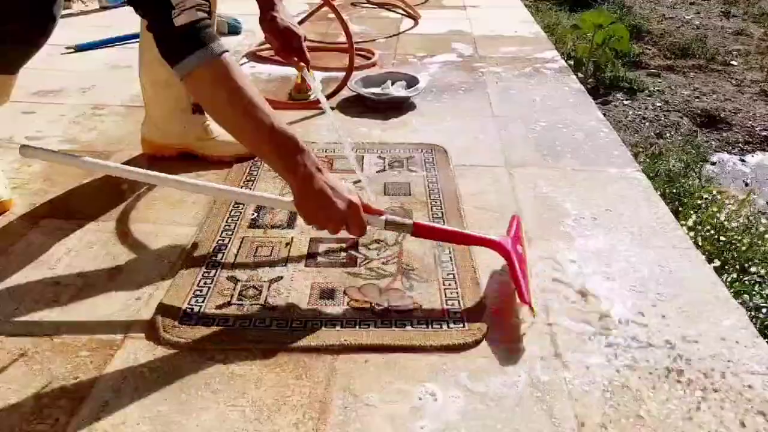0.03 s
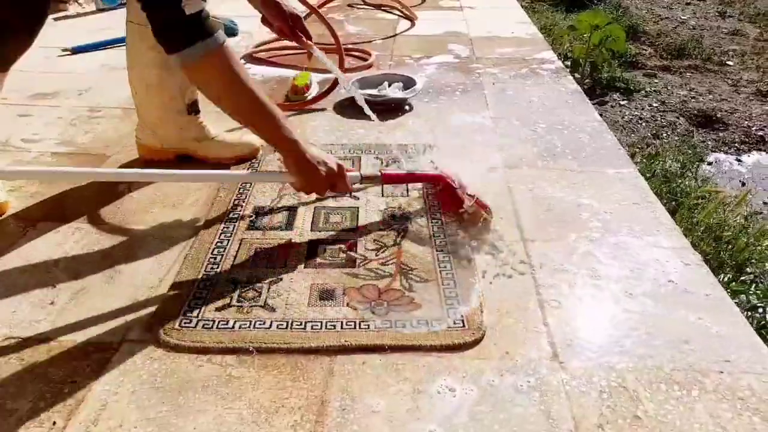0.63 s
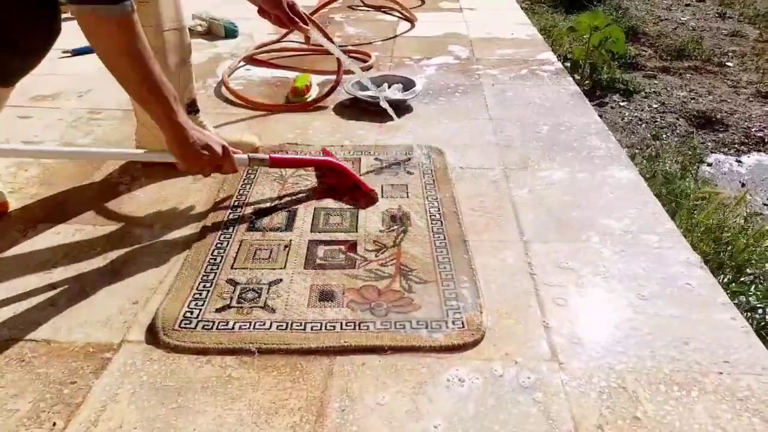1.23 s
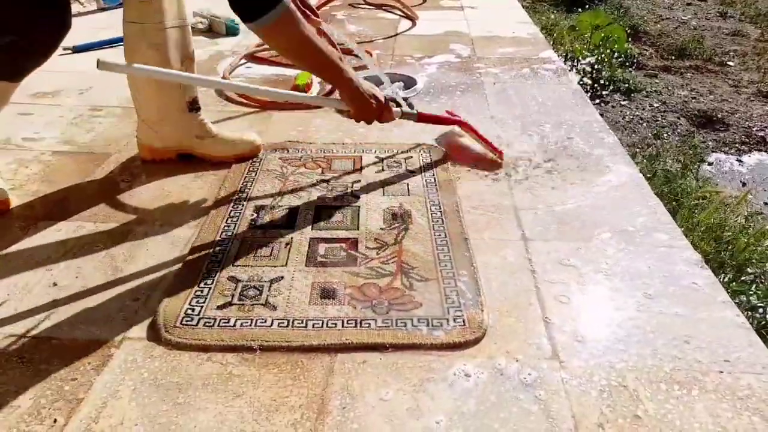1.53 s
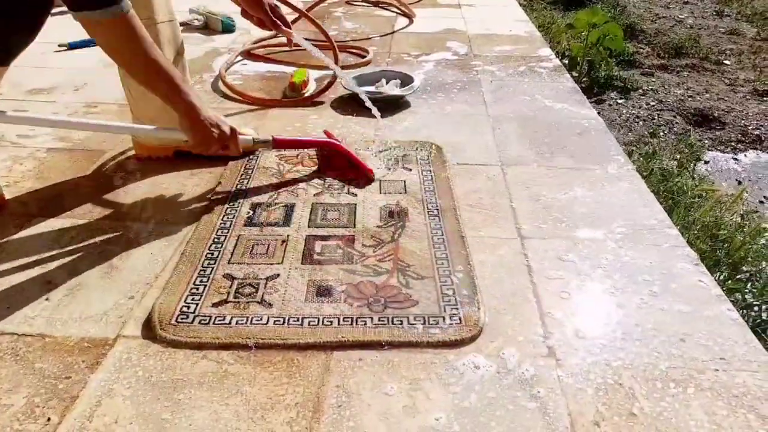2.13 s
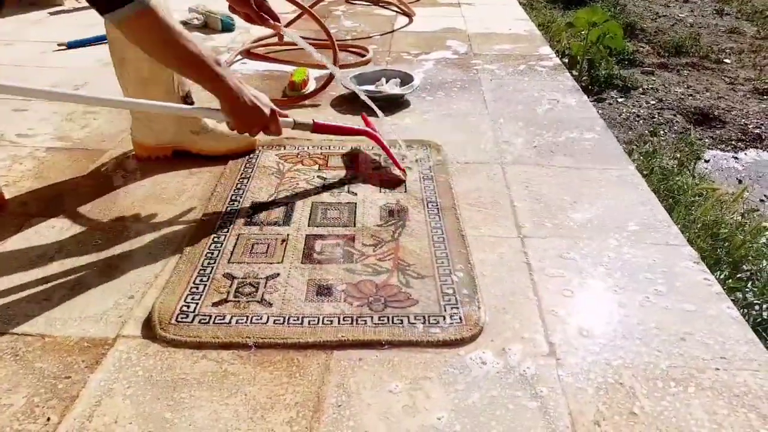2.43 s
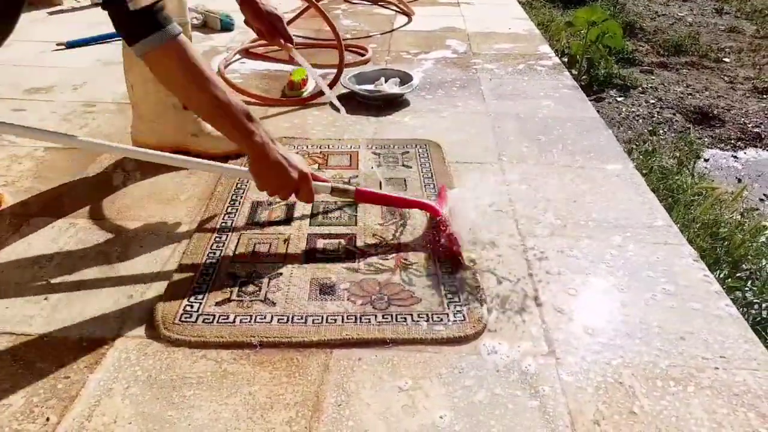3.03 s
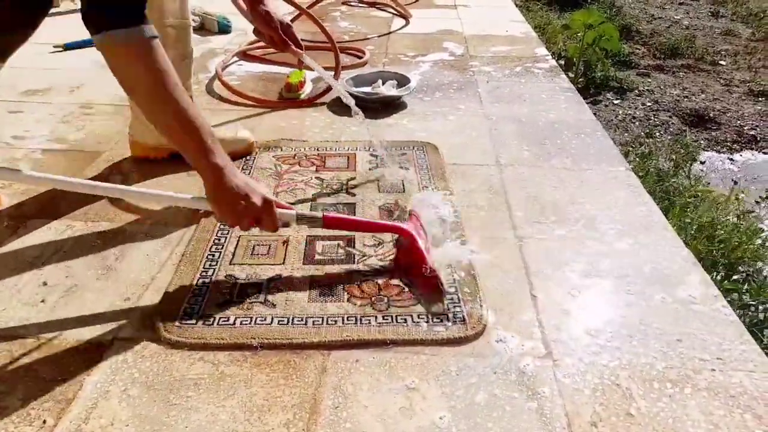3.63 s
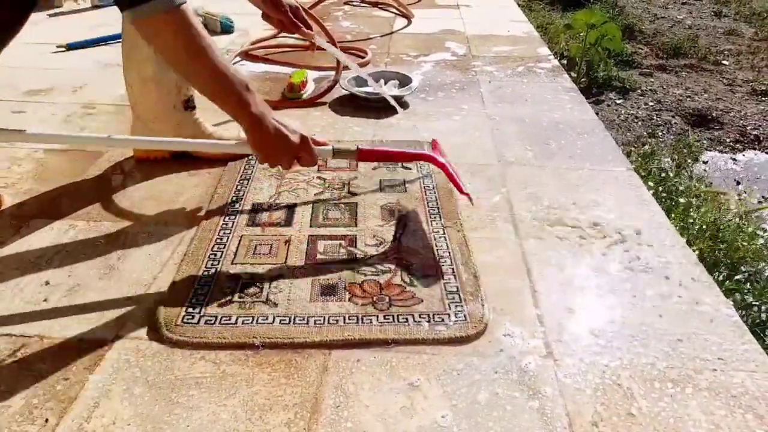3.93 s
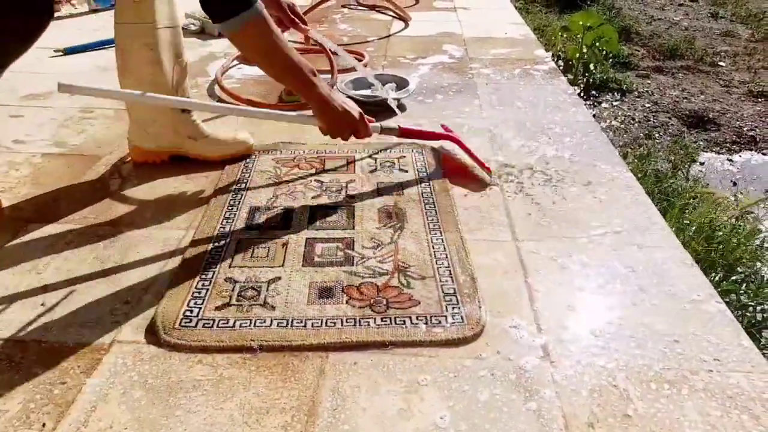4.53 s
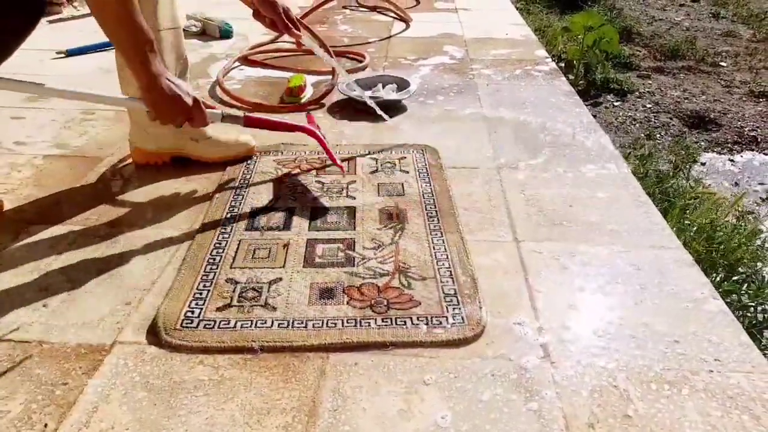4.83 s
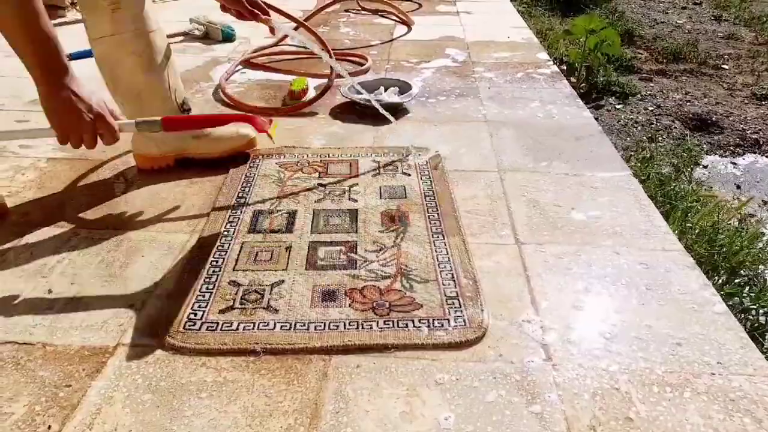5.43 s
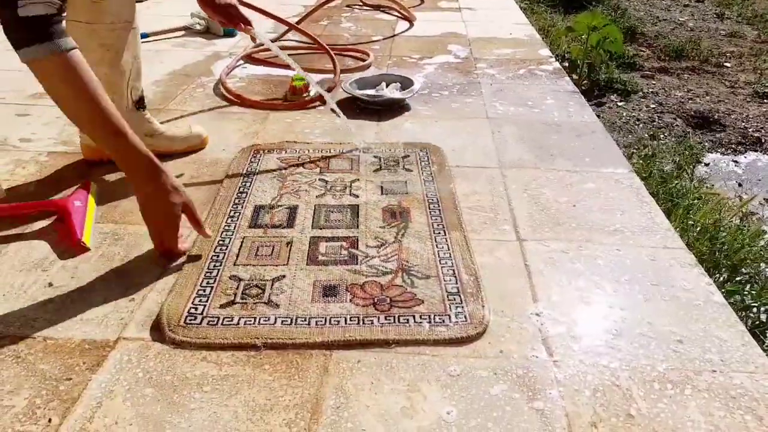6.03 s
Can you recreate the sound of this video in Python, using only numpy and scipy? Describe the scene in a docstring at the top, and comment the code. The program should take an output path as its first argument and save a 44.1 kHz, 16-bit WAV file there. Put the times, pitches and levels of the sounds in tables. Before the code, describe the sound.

Close by on an outdoor stone patio, a rubber blade chatters and splashes over a wet rug in seven quick, evenly spaced pushes. Some finish with a sharp knock from the hollow plastic head, echoing briefly off a wall. Between them, runoff drips over the faint trickle of a hose. Finally the squeegee handle falls and clatters on the paving in several bounces that die away.

```python
"""Seven wet, chattering pushes of a plastic squeegee over a soaked rug, then its handle bouncing on stone.
The rubber blade sticks and slips on the pile: each slip thumps the rug and squirts water.
Some strokes end in a clack that rings the hollow head. A hose trickles throughout, and pushed-off
water runs and drips between strokes. The house wall and the stone patio throw the knocks back."""
import sys
import numpy as np
from scipy import signal
from scipy.fft import rfft, irfft, next_fast_len
from scipy.io import wavfile

SR = 44100
rng = np.random.default_rng(int(sys.argv[2]) if len(sys.argv) > 2 else 0)


def int16_out(signal):
    """Quantize to a 16-bit WAV file."""
    q = np.round(np.clip(np.atleast_2d(signal).T, -1, 1) * 32767)
    wavfile.write(sys.argv[1], SR, q.astype(np.int16))


N = 276948
T = np.arange(N) / SR
RIGHT_DELAY_S = 0.0002234

# Blade pushes: land_s, grip_s, hardest_s, lift_s, water_delay_s, bump_db, thump_db, slosh_db, spray_db,
# land_slips_per_s, lift_slips_per_s, rubber_hz
STROKES = [(.434, .575, 0.62, 0.71, 0.0079, -36, -27.5, -36.5, -32, 90.4, 71.4, 287),
           (1.219, 1.288, 1.395, 1.472, .001, -31.5, -23.5, -35, -32.5, 85, 79, 280),
           (1.973, 2.14, 2.24, 2.284, 0.032, -39.5, -29, -38.5, -35, 65.8, 101, 290),
           (2.738, 2.915, 2.96, 3.075, 0.032, -42.5, -28, -35, -32.5, 80, 62.3, 341),
           (3.528, 3.608, 3.696, 3.745, 0.00072, -40, -29.5, -31, -30, 75, 75, 288.3),
           (4.206, 4.285, 4.385, 4.45, 0.02, -47.5, -27.5, -39, -33.5, 78.6, 75.3, 250),
           (4.96, 5.045, 5.08, 5.122, 0.0042, -38.5, -37.5, -44, -34.5, 85.5, 53.4, 270)]
# Dull thump spectrum: freq_hz, level_db
THUMP_SPECTRUM = [(25, -38), (75, -4), (160, 2.5), (260, 4), (390, -0.5), (540, -7.5), (700, -13),
                  (3000, -70)]


def gain(db):
    return 10 ** (np.asarray(db) / 20)


def unit_rms(x):
    return x / np.sqrt(np.mean(x ** 2) + 1e-20)


def bell(centre_s, sigma_s):
    return np.exp(-((T - centre_s) / sigma_s) ** 2 / 2)


def curve_at(points, hz):
    """Interpolates on a log-frequency axis."""
    freq_hz, value = np.transpose(points)
    return np.interp(np.log(hz + 1), np.log(freq_hz + 1), value)


def add(mix, start_s, sound):
    part = mix[:, max(round(start_s * SR), 0):][:, :sound.shape[-1]]
    part += sound[..., :part.shape[-1]]


def colour(x, spectrum, size=4096):
    """Minimum-phase filter of unit energy."""
    log_gain = np.log(gain(curve_at(spectrum, abs(np.fft.fftfreq(size, 1 / SR)))))
    response = np.fft.ifft(np.exp(np.conj(signal.hilbert(log_gain)))).real[:size // 2]
    response /= np.linalg.norm(response)
    return signal.oaconvolve(np.atleast_2d(x), response[None], axes=1)[:, :x.shape[-1]]


def wander(per_s):
    """Random drift, rms 1."""
    knots_s = np.arange(0, T[-1] + 1, 1 / per_s)
    return unit_rms(np.interp(T, knots_s, rng.standard_normal(len(knots_s))))


def diffuse(pair, lean=1):
    """Two unrelated signals to stereo: alike in the bass, right side later."""
    # Left-right likeness: freq_hz, coherence
    likeness = [(100, 0.5), (400, 0.82), (700, 0.52), (1200, 0.08), (14000, 0.01)]
    # Stereo balance: freq_hz, left_minus_right_db
    balance = [(100, 0.5), (400, -4), (2300, 7.5), (3300, -9), (4500, 0), (6500, -3.5), (9000, 9.5),
               (11000, 0.5)]
    size = next_fast_len(pair.shape[1] + 256)
    left, other = rfft(pair, size)
    hz = np.fft.rfftfreq(size, 1 / SR)
    coherence = np.clip(curve_at(likeness, hz), -1, 1)
    side = gain(lean * curve_at(balance, hz) / 2)
    right = coherence * left + np.sqrt(1 - coherence ** 2) * other
    right *= np.exp(-2j * np.pi * hz * RIGHT_DELAY_S)
    return irfft(np.array([left * side, right / side]), size)[:, :pair.shape[1]]


def point_source(x, left_db):
    """Mono to stereo: left_db louder on the left, right side later."""
    index = np.arange(len(x))
    right = np.interp(index - round(RIGHT_DELAY_S * SR), index, x, left=0)
    return np.array([x * gain(left_db / 2), right / gain(left_db / 2)])


def clicks(per_s, spread_db):
    """Two random click trains of uneven size, rms 1."""
    size = gain(spread_db * np.minimum(rng.exponential(1, (2, N)), 5))
    return unit_rms(size * rng.choice([-1, 1], (2, N)) * (rng.random((2, N)) < per_s / SR))


def air(level_db=-65.5):
    """Low outdoor background."""
    # Rumble spectrum: freq_hz, level_db
    spectrum = [(20, -30), (60, -5), (125, -1.5), (200, -9), (3000, -21.5)]
    level = gain(level_db + 4.2 * wander(per_s=4.4))
    return level * diffuse(colour(rng.standard_normal((2, N)), spectrum))


def flow(hose_db=-58.3, rise_s=0.018, drain_s=0.32):
    """Gains of the steady hose and of runoff waves, which arrive fast and drain slowly."""
    # Waves of pushed-off water: start_s, level_db
    runoff = [(.27, -51.5), (0.798, -50.5), (1.07, -48.5), (1.68, -55), (3.2, -51), (3.97, -50.5),
              (4.65, -55.5)]
    # Brief dip in the trickle: centre_s, depth_db, sigma_s
    lull = (5.255, 16, .048)
    waves = np.zeros(N)
    for start_s, db in runoff:
        t = np.maximum(T - start_s, 0)
        waves = np.hypot(waves, gain(db) * np.minimum(t / rise_s, 1) * np.exp(-t / drain_s))
    centre_s, depth_db, sigma_s = lull
    dip = gain(-depth_db * bell(centre_s, sigma_s))
    return gain(hose_db) * dip, waves * dip


def trickle(fizz_db=2.5, ticks_db=-9, patter_db=1.0, hose_tilt_db_per_octave=4, bands=24):
    """Water running on stone: droplet fizz, separate ticks and pitched spatter, finer under the hose."""
    # Running water spectrum: freq_hz, level_db
    spectrum = [(300, -38), (800, -15), (1600, -4.5), (4200, 0.5), (7500, -2), (10000, -10), (12700, 1),
                (16000, -8)]
    hose, waves = flow()
    fizz = gain(fizz_db) * clicks(per_s=4800, spread_db=3.5) * unit_rms(gain(2 * wander(per_s=140)))
    ticks = gain(ticks_db) * clicks(per_s=60, spread_db=3)
    patter, t = np.zeros((2, N)), np.arange(SR // 50) / SR
    for hz in np.geomspace(1400, 13000, bands):
        plink = np.sin(2 * np.pi * hz * t) * np.exp(-t * hz / 10)
        clumps = clicks(per_s=60, spread_db=2.5) * gain(6 * np.clip(wander(per_s=24), -2, 2))
        hose_tilt = gain(hose_tilt_db_per_octave * min(np.log2(hz / 5000), 0))
        level = np.hypot(waves * min(hz / 2500, 1), hose * hose_tilt)
        patter += level * unit_rms(signal.oaconvolve(clumps, plink[None], axes=1)[:, :N])
    running = np.hypot(hose, waves) * colour(fizz + ticks, spectrum)
    return diffuse(running + gain(patter_db) * patter / np.sqrt(bands))


def impact(spectrum, scatter, decay_s):
    """A sharp contact, then a short noisy scatter."""
    t = np.arange(SR // 10) / SR
    burst = rng.standard_normal((2, len(t))) * np.exp(-t / decay_s)
    contact = point_source(signal.unit_impulse(len(t)), left_db=2.5)
    hit = contact + scatter * burst / np.linalg.norm(burst[0])
    return unit_rms(colour(hit, spectrum)) / np.sqrt(20)


def head_ring(uneven_db=2):
    """The hollow head and handle ring, struck a little differently each time."""
    # Modes: freq_hz, level_db, t60_s
    modes = [(380, -7, 0.44), (468, -1.5, .14), (571, 0.5, 0.17), (905, 2, .2), (974, 0.5, 0.18),
             (1136, -1.5, .2), (1200, -1.5, .24), (1375, -1, .22), (1653, -7, 0.1), (2022, -4.5, 0.29),
             (2250, -4, .13)]
    t, out = np.arange(SR // 3) / SR, 0
    for hz, db, t60_s in modes:
        phase = rng.random((2, 1))
        strike_db = db + uneven_db * rng.standard_normal()
        out = out + gain(strike_db - 60 * t / t60_s) * np.sin(2 * np.pi * (hz * t + phase))
    return diffuse(out * np.minimum(t / .002, 1), lean=.15)


def wall_echo(swell_s=.022, decay_s=0.026, tail_db=-16, tail_t60_s=0.54):
    """Walls and paving return a knock as a dense, swelling cluster with a faint tail."""
    # Echo spectrum: freq_hz, level_db
    spectrum = [(60, -27.5), (200, -13.5), (400, -2), (650, -10), (950, -3), (1400, -3.5), (2300, -6.5),
                (2900, -14.5), (4800, -19), (8000, -31.5), (16000, -37.5)]
    t = np.arange(SR // 2) / SR
    cluster = np.minimum(0.4 + 0.99 * t / swell_s, np.exp(-(t - swell_s) / decay_s))
    cluster *= 1 - np.exp(-t / 0.0013)
    tail = gain(tail_db - 60 * t / tail_t60_s) * np.minimum(t / swell_s, 1)
    taps = rng.standard_normal((2, len(t))) * (rng.random((2, len(t))) < .2)
    return unit_rms(diffuse(colour(taps * (cluster + tail), spectrum), lean=.15)) / np.sqrt(10)


def knocks(held_ring_db=-22, free_ring_db=-12.5, clack_tick_db=-27, bounce_echo_db=-3):
    """Landings, head clacks, handle bounces; a hand damps the ring. Settings are relative to the clack."""
    # Plastic clack spectrum: freq_hz, level_db
    clack_spectrum = [(100, -22.5), (350, -7), (1000, 8), (2300, 3.5), (3200, -13), (5500, -22),
                      (8000, -27.5), (16000, -42)]
    # Hard tick spectrum: freq_hz, level_db
    tick_spectrum = [(400, -25.5), (2200, 3.5), (4000, 1.5), (6500, -1), (9500, -12), (12300, 4),
                     (14000, -1), (16000, -9.5)]
    # Head leaving the rug: start_s, clack_db, thud_db, echo_db
    clacks = [(.001, -26, -36.5, -35), (0.6934, -21.5, -26, -43), (.729, -31, -29, -43.5),
              (1.4646, -7, -25, -20.5), (1.4695, -15, -29, -44), (3.018, -26.5, -28, -56),
              (3.046, -25, -41, -52), (3.743, -8.5, -24, -25), (4.468, -24.5, -33, -44),
              (4.482, -12.5, -42, -27.5)]
    # Dropped handle on stone: start_s, clack_db, tick_db, thud_db
    bounces = [(5.652, -39, -33, -37), (5.658, -41, -27, -23), (5.679, -43.5, -39, -27.5),
               (5.7965, -21, -19.5, -41), (5.952, -29.5, -21.5, -22), (5.961, -19, -22, -49),
               (6.138, -37, -28, -40.5), (6.242, -49, -32.5, -51), (6.257, -39, -67, -45)]
    out = np.zeros((2, N))
    for land_s, _, _, _, _, bump_db, *_ in STROKES:
        bump = impact(THUMP_SPECTRUM, scatter=.3, decay_s=.004)
        tap = impact(clack_spectrum, scatter=0.86, decay_s=0.0014)
        add(out, land_s, gain(bump_db) * (bump + 0.17 * tap))
    hits = [(s, db, db + clack_tick_db, thud, echo, held_ring_db) for s, db, thud, echo in clacks]
    hits += [(s, db, tick, thud, db + bounce_echo_db, free_ring_db) for s, db, tick, thud in bounces]
    for start_s, clack_db, tick_db, thud_db, echo_db, ring_db in hits:
        add(out, start_s, gain(clack_db) * impact(clack_spectrum, scatter=1.0, decay_s=0.0017))
        add(out, start_s, gain(clack_db + ring_db) * head_ring())
        add(out, start_s, gain(tick_db) * impact(tick_spectrum, scatter=1.8, decay_s=0.0021))
        add(out, start_s, gain(thud_db) * impact(THUMP_SPECTRUM, scatter=0.76, decay_s=0.021))
        add(out, start_s, gain(echo_db) * wall_echo())
    return out


def handle_shudder(rise_s=0.026):
    """The long handle shakes: rough, low, fading."""
    # Shudders: start_s, level_db, pitch_hz, decay_s
    shudders = [(.001, -34, 111, 0.046), (3.021, -26, 128, 0.064)]
    out = 0
    for start_s, db, hz, decay_s in shudders:
        t = np.maximum(T - start_s, 0)
        band = [(hz / 2, -26), (hz / 1.2, -10), (hz, 0), (hz * 1.2, -9), (2 * hz, -15), (hz * 5, -50)]
        shake = unit_rms(colour(rng.standard_normal(N), band))
        out += gain(db) * shake * np.minimum(t / rise_s, 1) * np.exp(-t / decay_s)
    return out


def drips(trim_db=-3, bubble_gain=.9, rise_per_s=14, decay_s=0.003):
    """Each drop ticks on stone and traps a bubble whose pitch rises as it dies."""
    # Single drops: start_s, level_db, pitch_hz
    drops = [(0.277, -45, 1990), (0.9295, -46.5, 4420), (1.081, -38.5, 3300), (1.090, -39.5, 3380),
             (1.1235, -35.5, 4060), (1.177, -39, 7520), (1.699, -40.5, 4750), (1.725, -38.5, 7420),
             (1.888, -46, 1450), (2.4434, -41.5, 7180), (3.2147, -38, 2800), (3.3773, -52, 4050),
             (3.9326, -39, 1975), (4.0148, -39, 4350), (4.0767, -41, 1500), (4.666, -42, 6830),
             (4.679, -34, 2405), (4.8975, -45.5, 6020), (4.945, -40, 4700), (5.3109, -45.5, 3200),
             (5.3441, -43, 7500), (5.374, -45.5, 4670), (5.438, -48.5, 5000)]
    out, t = np.zeros((2, N)), np.arange(SR // 10) / SR
    for start_s, db, hz in drops:
        envelope = np.exp(-t / decay_s) * (1 - np.exp(-t / .0004))
        plink = envelope * np.sin(2 * np.pi * hz * (t + rise_per_s * t ** 2 / 2))
        band = [(hz / 4, -26), (hz / 1.3, -8), (hz, 0), (hz * 1.3, -8), (hz * 3, -26)]
        splat = impact(band, scatter=4, decay_s=0.003)
        add(out, start_s, gain(db + trim_db) * (bubble_gain * point_source(plink, left_db=-2.5) + splat))
    return out


def splashes():
    """A handful of drops lands together, ringing around one pitch."""
    # Water slopping from the blade or onto paving: centre_s, level_db, pitch_hz, sigma_s
    slops = [(0.305, -51, 4770, 0.044), (2.852, -35, 2450, .02), (3.23, -44, 2300, 0.021),
             (4.394, -36.5, 4500, 0.022)]
    out = np.zeros((2, N))
    for centre_s, db, hz, sigma_s in slops:
        band = [(hz / 4, -30), (hz / 1.45, -12), (hz, 0), (hz * 1.28, -13), (2 * hz, -22)]
        drops = unit_rms(colour(clicks(per_s=1300, spread_db=-4.0), band))
        out += gain(db) * drops * bell(centre_s, sigma_s)
    return diffuse(out)


def push(land_s, hardest_s, lift_s, shape, bite_s=0.0087):
    """Gain of one push: swells as the arm leans in, sags as it stretches, dies once the blade lifts."""
    swell_db, exponent, lead_s, sag_db, release_db_per_s = shape
    peak_s = hardest_s - lead_s
    to_come = np.clip((peak_s - T) / (peak_s - land_s), 0, 1)
    spent = np.clip((T - peak_s) / (lift_s - peak_s), 0, 1)
    lifted_s = np.clip(T - lift_s, 0, 1)
    db = -swell_db * to_come ** exponent - sag_db * spent ** 2 - release_db_per_s * lifted_s
    return np.clip((T - land_s) / bite_s, 0, 1) * gain(db)


def stroke_controls(grip_fade_s=0.033, skid_chatter_db=-8, skid_rub_db=-1):
    """Layer gains, slip rate and rubber pitch; the blade skips lightly until it grips."""
    # Push envelope of each layer: swell_db, exponent, lead_s, sag_db, release_db_per_s
    thump_shape = (13, 1.07, 0.001, 10, 340)
    slosh_shape = (16, 1.1, .01, 2, 470)
    spray_shape = (9.5, 1.2, 0.023, 9, 260)
    chatter, rub, slosh, spray = np.zeros((4, N))
    slip_hz, pitch_hz = np.full(N, float(STROKES[0][-3])), np.full(N, float(STROKES[0][-1]))
    for land_s, grip_s, hardest_s, lift_s, water_delay_s, _, *voice in STROKES:
        thump_db, slosh_db, spray_db, land_hz, lift_hz, rubber_hz = voice
        skid = np.clip((grip_s - T) / grip_fade_s + .5, 0, 1)
        pressure = gain(thump_db) * push(land_s, hardest_s, lift_s, thump_shape)
        chatter += pressure * gain(skid_chatter_db * skid)
        rub += pressure * gain(skid_rub_db * skid)
        slosh += gain(slosh_db) * push(land_s + water_delay_s, hardest_s, lift_s, slosh_shape)
        spray += gain(spray_db) * push(land_s + water_delay_s, hardest_s, lift_s, spray_shape)
        slip_hz = np.where(T < land_s, slip_hz, np.interp(T, [land_s, lift_s], [land_hz, lift_hz]))
        pitch_hz = np.where(T < land_s, pitch_hz, rubber_hz)
    return chatter, rub, slosh, spray, slip_hz, pitch_hz


def scrape(jitter=.06, uneven_db=0.7, thump_db=-1, rub_db=-14, grit_db=-11,
           squirt_phase=.45, flex=0.22, flap_sag=0.23):
    """Stick-slip of the blade: each slip thumps the rug, squirts droplets and snaps grit."""
    # Squeezed water spectra: freq_hz, level_db
    slosh_spectrum = [(300, -20), (700, 2), (1300, 4), (1900, -1), (2350, 3), (2900, -12.5), (6000, -29)]
    spray_spectrum = [(800, -21.5), (2400, 3.5), (3000, -2.5), (4300, -0.5), (6500, -6), (8300, -4),
                      (10500, -6), (12700, -1), (16000, -12)]
    chatter, rub, slosh, spray, slip_hz, pitch_hz = stroke_controls()
    cycles = np.cumsum(slip_hz * (1 + jitter * wander(per_s=70))) / SR
    slip_index, phase = cycles.astype(int), cycles % 1
    force = gain(uneven_db * rng.standard_normal(N))[slip_index]
    slips = unit_rms(np.diff(slip_index, prepend=0) * force)
    # The rubber springs back; its pitch drifts as the blade flexes and sags within each slip.
    age_s = phase / slip_hz
    drift = flex * wander(per_s=16) + 0.11 * rng.standard_normal(N)[slip_index]
    flap_hz = pitch_hz * np.exp(drift + flap_sag * (.5 - phase))
    flap = np.sin(2 * np.pi * flap_hz * age_s) * np.exp(-age_s / 0.008) * force
    thumps = unit_rms(colour(slips, THUMP_SPECTRUM)[0] + 1.5 * unit_rms(np.gradient(flap)))
    friction = diffuse(colour(rng.standard_normal((2, N)), THUMP_SPECTRUM))
    # Each squirt starts abruptly and dies into the steady flow.
    squirt_cycles = cycles + 1 - squirt_phase
    squirt_size = gain(3 * rng.standard_normal(N))[squirt_cycles.astype(int)]
    squirt = squirt_size * np.exp(-(squirt_cycles % 1) / .3)
    coarse = unit_rms(colour(clicks(per_s=4500, spread_db=2.5) * (0.17 + squirt), slosh_spectrum))
    fine = unit_rms(colour(clicks(per_s=14000, spread_db=2.0) * (0.55 + squirt), spray_spectrum))
    grit = unit_rms(colour(clicks(per_s=400, spread_db=1) * np.sqrt(squirt), spray_spectrum))
    water = diffuse(slosh * coarse + spray * (fine + gain(grit_db) * grit))
    rug = chatter * gain(thump_db) * point_source(thumps, left_db=0) + rub * gain(rub_db) * friction
    return rug + water


def head_drag():
    """The rubber edge rubs dully over stone between bounces."""
    # Drags: centre_s, level_db, sigma_s
    drags = [(5.87, -45, 0.14)]
    level = sum(gain(db) * bell(centre_s, sigma_s) for centre_s, db, sigma_s in drags)
    return level * diffuse(colour(clicks(per_s=550, spread_db=4.5), THUMP_SPECTRUM))


def handle_puff(right_db=-20):
    """The falling handle pushes a low puff of air, nearly all on the left."""
    # Puffs: start_s, level_db, pitch_hz, decay_s
    puffs = [(5.951, -11, 67, 0.014)]
    out = 0
    for start_s, db, hz, decay_s in puffs:
        t = np.maximum(T - start_s, 0)
        out -= gain(db) * np.sin(2 * np.pi * hz * t) * np.exp(-t / decay_s)
    return gain([[0], [right_db]]) * out


def patio_reverb(x, first_s=0.0071):
    """Sparse reflections; the bass lingers longest."""
    # Patio decay: freq_hz, t60_s
    decay = [(120, 0.55), (240, 0.33), (1500, 0.22), (14000, 0.11)]
    taps = rng.standard_normal((2, SR)) * (rng.random((2, SR)) < .08) * (T[:SR] > first_s)
    hz, t, bands = signal.stft(diffuse(taps, lean=0), SR, nperseg=512)
    fade = gain(-60 * t / curve_at(decay, hz)[:, None])
    tail = signal.istft(bands * fade, SR, nperseg=512)[1]
    return signal.fftconvolve(x.mean(0)[None], tail / np.linalg.norm(tail[0]), axes=1)[:, :N]


def scene(reverb_db=-14):
    """All sources on the patio."""
    near = scrape() + knocks() + head_drag() + drips() + splashes()
    reverb = gain(reverb_db) * patio_reverb(near)
    return near + reverb + trickle() + handle_shudder() + handle_puff() + air()


def record(dry):
    """Clip at full scale, then low-pass at 16 kHz."""
    lowpass = signal.firwin(511, 16000, window=("kaiser", 9), fs=SR)
    return signal.oaconvolve(np.clip(dry, -1, 1), lowpass[None], "same")


dry = scene()
out = record(dry)
int16_out(out)
```